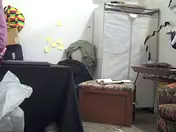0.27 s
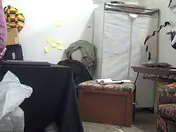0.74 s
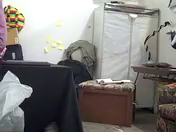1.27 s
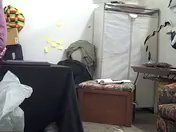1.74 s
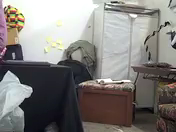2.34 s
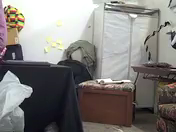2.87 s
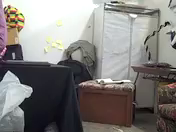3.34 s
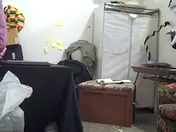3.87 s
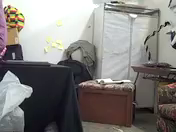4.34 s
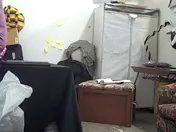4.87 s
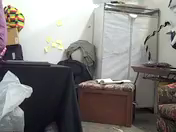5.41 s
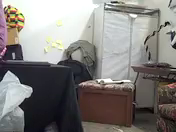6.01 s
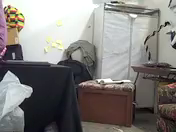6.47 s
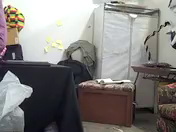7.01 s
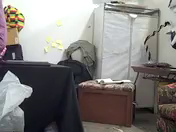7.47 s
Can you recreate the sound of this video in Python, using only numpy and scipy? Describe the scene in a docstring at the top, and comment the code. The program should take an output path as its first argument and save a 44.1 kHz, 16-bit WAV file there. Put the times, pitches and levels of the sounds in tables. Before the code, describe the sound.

A low steady hiss fills a small furnished room, with the microphone about three metres from a wooden door. A light knock at 0.3 seconds and a firmer one at 0.6 open the knocking. Four strong, dull, fleshy thumps follow at about 1.2, 1.5, 1.9 and 2.4 seconds, each shaking a small metallic rattle from the latch. Two sharper, hollow knuckle raps land at 3.0 and 3.3 seconds, then a faint tap at 3.8. Three quick, hard raps come at 4.2, 4.4 and 4.7 seconds. After a pause with only hiss, a hard rap sounds at 6.0 seconds. Three more follow at about 6.4, 6.8 and 7.3 seconds, nearer the latch, brighter and with more rattle. Every blow has a woody body and leaves a short room echo with a low boom.

```python
"""A small furnished room, one microphone about 3 m from a wooden door. Someone knocks: six dull blows,
then sharper knuckle raps, the last three nearer the latch. Each blow runs ahead through the wood as a
falling chirp, arrives through the air as a thud, and shakes the latch a moment later.
The room answers with early echoes, a short tail and a low boom, over a steady hiss."""
import sys
import numpy as np
from scipy import signal
from scipy.fft import rfft, irfft, next_fast_len
from scipy.io import wavfile

SR = 44100
rng = np.random.default_rng(int(sys.argv[2]) if len(sys.argv) > 2 else 0)


def dump(signal):
    """Clip the signal to [-1, 1] and save it as 16-bit WAV at the path in sys.argv[1]."""
    limited = np.clip(np.atleast_2d(signal).T, -1, 1)
    pcm = np.round(limited * 32767).astype(np.int16)
    wavfile.write(sys.argv[1], SR, pcm)


N = 341334
SIZE = 32768  # samples in one blow, which is built as a spectrum
HZ = np.fft.rfftfreq(SIZE, 1 / SR)
TIME = np.arange(SIZE) / SR


def amp(db):
    """Decibels to gain."""
    return 10 ** (np.asarray(db) / 20)


def along(points, hz):
    """Read (f/Hz, value) points on a log frequency axis."""
    freqs, values = np.transpose(points)
    return np.interp(np.log(hz + 1), np.log(freqs), values)


def delay(s):
    """Response of a pure delay."""
    return np.exp(-2j * np.pi * HZ * s)


def resonances(modes):
    """Summed response of damped modes given as (f/Hz, width/Hz, level/dB)."""
    return sum(amp(db) * 1j * HZ * width / (hz ** 2 - HZ ** 2 + 1j * HZ * width)
               for hz, width, db in modes)


def causal(db):
    """Minimum-phase response with the given dB curve: nothing sounds before the blow."""
    cepstrum = irfft(np.log(amp(db)))
    fold = 1 + np.sign(SIZE / 2 - np.arange(SIZE)) - (TIME == 0)
    return np.exp(rfft(cepstrum * fold))


def scatter(life_s):
    """A brief burst of random reflections with energy 1."""
    burst = rng.standard_normal(SIZE) * np.exp(-TIME / life_s)
    return rfft(burst / np.linalg.norm(burst))


def roughen(depth, life_s, scatter_hz=450):
    """Scattering that keeps the average energy; long waves pass small obstacles untouched."""
    share = depth * 1j * HZ / (scatter_hz + 1j * HZ)
    return (1 + share * scatter(life_s)) / np.hypot(1, np.abs(share))


def hiss(rms_db=-53):
    """Steady room tone and microphone noise."""
    # background spectrum: f/Hz, relative level/dB
    noise_floor = [(12, -27.5), (20, -2.5), (32, -26), (180, 1.5), (402, -14.5), (565, -6), (638, -3.5),
                   (687, -7.5), (815, -9), (943, -5.5), (1040, -7), (2380, -13), (3700, -19), (6800, -27),
                   (8840, -65.5), (15000, -120)]
    colour = amp(along(noise_floor, np.fft.rfftfreq(N, 1 / SR)))
    noise = irfft(rfft(rng.standard_normal(N)) * colour, N)
    return amp(rms_db) * noise / np.sqrt(np.mean(noise ** 2))


def knocking(door_db=13, latch_db=8):
    """Every blow sounds the door and its latch, then dies away."""
    # blows: t/s, strength/dB, hardness (0 flesh .. 1 knuckle), hollow tone f/Hz, its level/dB
    blows = [ (0.3458, -13, 0.6, 242, -3), (0.6334, -7, 0.056, 262, -2), (1.2260, -2, 0.17, 235, -3),
             (1.5335, -.5, 0.12, 250, 5), (1.8540, -.5, 0.031, 247, 5), (2.3722, 0, 0.2, 269, -11),
             (3.0193, -1.5, 0.76, 258, 6), (3.3241, -1.5, 0.73, 257, 7.5), (3.7814, -16, 0.57, 283, 16.5),
             (4.1604, -0.5, 0.73, 256, -5), (4.4200, .5, 0.91, 260, -18), (4.6760, -.5, 0.82, 262, -4),
             (5.9630, 0, 1, 256, -2), (6.3549, -4, 0.91, 248, 8), (6.7962, -5, 0.67, 230, 8),
             (7.2557, -3, 0.76, 288, 6), ]
    # where the hand lands: t/s, spot (0 mid-door .. 1 latch edge)
    spots = [(5.97, 0.041), (6.35, 0.97), (6.8, 0.63), (7.26, 0.58)]
    out = np.zeros(N + SIZE)
    common_tail = diffuse()
    fade = np.minimum(1, 10 * (1 - TIME / TIME[-1])) ** 2
    for s, db, hardness, hollow_hz, hollow_db in blows:
        spot = np.interp(s, *np.transpose(spots))
        push = amp(door_db + db) * hand(db, hardness, spot)
        ring = panel(hollow_hz, hollow_db, hardness)
        wood = push * door_in_room(ring, common_tail)
        metal = amp(latch_db + rattle_db(db, hardness, spot)) * latch()
        out[round(s * SR):][:SIZE] += irfft(wood + metal) * fade
    return out[:N]


def hand(db, hardness, spot, bass_hz=340, treble_hz=1900):
    """Force spectrum of the hand on the wood: a harder contact is shorter and brighter."""
    # fleshy contact: f/Hz, level/dB
    flesh = [(30, -24.5), (70, -12.5), (140, -0.5), (260, -0.5), (380, -2.5), (520, -1), (850, -3),
             (1250, -8.5), (1700, -14), (2600, -28), (4500, -17), (7000, -34.5)]
    # knuckle contact: f/Hz, level/dB
    knuckle = [(30, -25.5), (70, -8), (140, 1), (260, 3), (420, -3.5), (650, -5), (1000, -5.5),
               (1600, -6.5), (2400, -7), (3300, -5.5), (4500, -10.5), (7000, -26)]
    contact_db = (1 - hardness) * along(flesh, HZ) + hardness * along(knuckle, HZ)
    # gentle blows linger and keep their bass; a knuckle, or a blow at the stiff edge, pushes less
    bass_db = 6.5 - 0.25 * db - 5.5 * hardness - 3.5 * spot
    treble_db = 3 - 4.5 * hardness + 13 * spot  # the edge answers more brightly than the middle
    low_shelf = bass_db / (1 + (HZ / bass_hz) ** 4)
    high_shelf = treble_db * HZ ** 2 / (HZ ** 2 + treble_hz ** 2)
    return causal(contact_db + low_shelf + high_shelf)


def forerunner(lag_s=0.0115, sweep_hz=1250):
    """Bending waves outrun the air, high notes first: a falling chirp, roughened by the frame."""
    # how well the bending wave radiates from the wood: f/Hz, level/dB
    radiation = [(200, -9.5), (500, -2), (1000, -3.5), (1600, 5), (2500, 6.5), (3300, -2), (4500, -7),
                 (7000, -4.5)]
    travel_s = lag_s * (1 + 0.029 * rng.standard_normal()) * np.exp(-HZ / sweep_hz)
    chirp = np.exp(-2j * np.pi * np.cumsum(travel_s) * HZ[1])
    return causal(along(radiation, HZ)) * chirp * roughen(depth=1.2, life_s=0.0023)


def thud(air_s=0.0092, soft_hz=2000):
    """The push that crosses the air to the microphone, rounded by the size of the hand."""
    return -delay(air_s) / (1 + 1j * HZ / soft_hz)


def panel(hollow_hz, hollow_db, hardness, hollow_width_hz=68):
    """The panel rings over a hollow, drum-like mode; no two blows land alike, so the strengths vary."""
    # panel modes: f/Hz, width/Hz, level/dB under fleshy blows, level/dB under knuckle raps
    panel_modes = [(140.8, 8.8, -2.5, -5.5), (457, 50, 1.5, -19), (512, 11, 5.5, -6), (668, 54, -7, -0.5),
                   (821, 80, 6.5, 2.5), (985, 34, -5.5, 3.5), (1155, 19, 4, -0.5), (1248, 23, 7, -11),
                   (1404, 77, -13, -7), (1540, 16, 3.5, 0.5), (1660, 46, -3.5, -5), (1970, 38, -5.5, -2.5),
                   (2322, 28, -13, 3.5), (2463, 31, 4.5, -3.5), (2720, 12, -7, -3.5)]
    modes = [(hz, width, soft + hardness * (hard - soft) + rng.normal(0, 2.9))
             for hz, width, soft, hard in panel_modes]
    return resonances(modes + [(hollow_hz, hollow_width_hz, hollow_db)])


def door_in_room(ring, common_tail, thud_db=2, boom_db=-56.5, fresh_share=0.57, ring_share=0.73):
    """The door at the microphone: direct sound and near echoes, standing waves, then the tail."""
    # nearest walls and furniture: delay/s, signed pressure gain
    echoes = [(.0024, -0.44), (.0037, 0.35), (.0074, 0.24), (0.0098, 0.16), (0.0108, .15), (.0210, 0.28)]
    # standing waves of the room: f/Hz, level/dB, T60/s
    room_modes = [(77, -1, .9), (119, -10, 0.77), (138.2, -1, 0.89), (157.6, 0.5, 0.87), (182.4, 0.5, .92),
                  (196.8, 2.5, 0.72), (211.8, 3.5, 0.66), (235, -6, 0.63), (257.4, 6, 0.14),
                  (304.6, -5, 0.81)]
    # how strongly the door feeds the tail: f/Hz, level/dB
    tail_feed = [(60, -5), (130, -1), (280, -1), (450, 6.5), (1000, 9.5), (1700, 8.5), (2350, 10.5),
                 (2900, 4.5), (3600, 1.5), (6000, 8.5)]
    near = 1 + sum(gain * delay(s) for s, gain in echoes)
    direct = forerunner() + amp(thud_db) * thud() * roughen(depth=0.38, life_s=0.0079)
    standing = sum(amp(db - 60 * TIME / t60) * np.sin(2 * np.pi * hz * TIME)
                   for hz, db, t60 in room_modes)
    boom = amp(boom_db) * rfft(standing) * thud()
    # part of the tail is the same for every blow, part is new each time
    tail = np.sqrt(1 - fresh_share) * common_tail + np.sqrt(fresh_share) * diffuse()
    tail *= causal(along(tail_feed, HZ))
    return direct * (1 + ring) * near + (boom + tail) * (1 + ring_share * ring)


def diffuse(build_s=0.0042, early_db=3, early_s=0.064):
    """A room tail of energy 1: dense echoes build up, then each band dies at its own speed."""
    # reverberation time of the room: f/Hz, T60/s
    room_t60 = [(100, 1), (200, 0.78), (400, 0.62), (1000, 0.47), (2300, 0.67), (4000, 0.6), (7000, 0.59)]
    hz, t, bands = signal.stft(rng.standard_normal(SIZE), SR, nperseg=256)
    decay = amp(-60 * t / along(room_t60, hz)[:, None])
    tail = signal.istft(bands * decay, SR, nperseg=256)[1][:SIZE]
    tail *= 1 - np.exp(-(TIME / build_s) ** 2)
    tail *= amp(early_db * np.exp(-TIME / early_s))
    return rfft(tail / np.linalg.norm(tail))


def rattle_db(db, hardness, spot, lift_db=-13):
    """Strong, fleshy or nearby blows shake the latch most; one too weak to lift it barely does."""
    shake_db = 0.55 * db - 5.1 * max(0, lift_db - db)
    return shake_db - 9.5 * hardness + 7.5 * spot


def latch(jitter_s=0.000478, wet_db=2, wet_s=0.022, dull_hz=5600):
    """The door springs back and the latch chatters: small, gritty metal contacts and their room wash."""
    # contacts: t/s after the blow, level/dB
    chatter = [(.0210, -7), (.0270, -6), (0.033, -4), (.0350, -6.5), (0.0379, -2)]
    # modes of latch and strike plate: f/Hz, width/Hz, level/dB
    metal_modes = [(1050, 960, -5.5), (2280, 1700, -4), (3056, 99, 1.5), (3530, 550, -4), (4520, 46, -4),
                   (4920, 72, -8.5), (5850, 200, -15.5)]
    clicks = 0
    for s, db in chatter:
        gain = amp(db + rng.normal(0, 0.73))
        clicks += gain * delay(s + jitter_s * rng.standard_normal()) * scatter(life_s=0.004)
    wash = amp(wet_db) * delay(wet_s) * diffuse()
    muffle = causal(-10 * np.log10(1 + (HZ / dull_hz) ** 6))  # the wood swallows the highest notes
    return (clicks + wash) * resonances(metal_modes) * muffle


def scene():
    """Knocks over the hiss, in mono."""
    return (knocking() + hiss())[None]


def record(dry):
    """The recorder cuts off steeply above its band limit."""
    top_hz = 6900
    size = next_fast_len(N + SR)
    hz = np.fft.rfftfreq(size, 1 / SR)
    low_pass = 1 / np.sqrt(1 + (hz / top_hz) ** 140)
    return irfft(rfft(dry, size) * low_pass, size)[:, :N]


dry = scene()
out = record(dry)
dump(out)
```